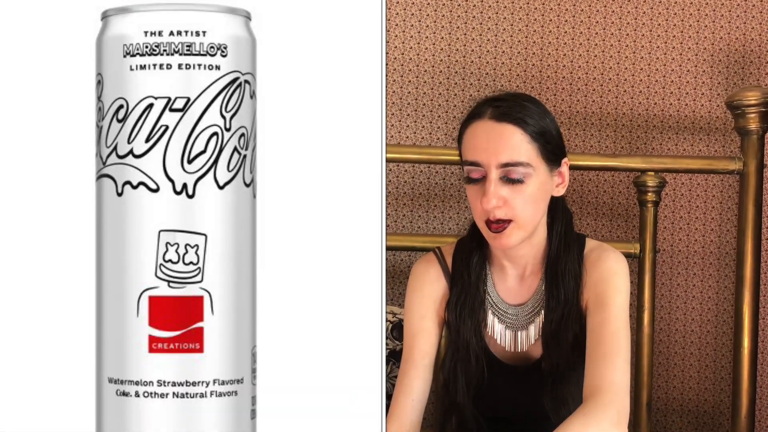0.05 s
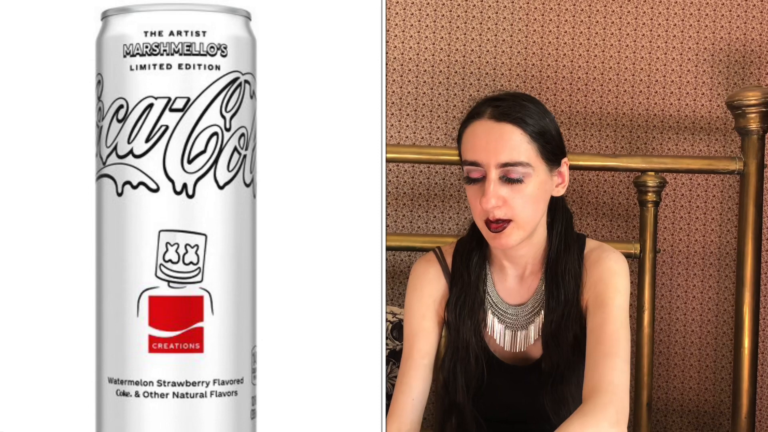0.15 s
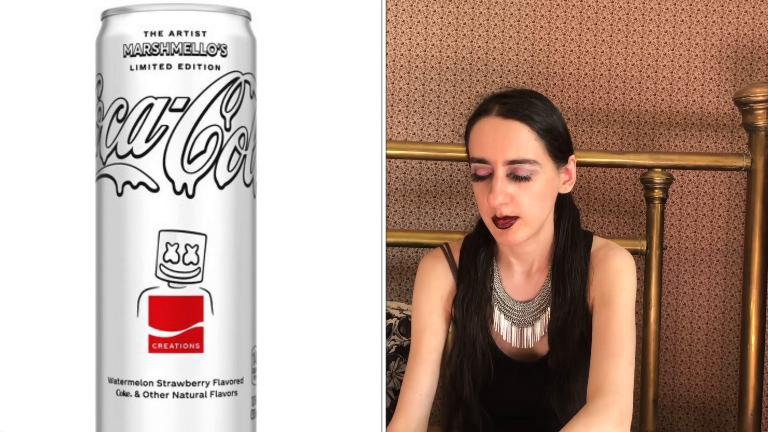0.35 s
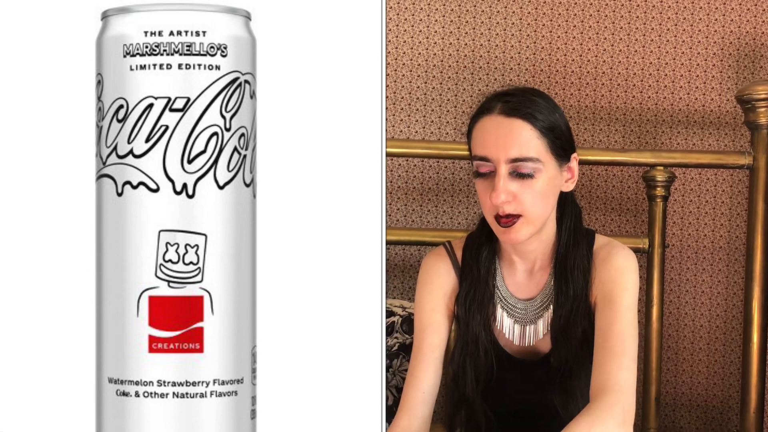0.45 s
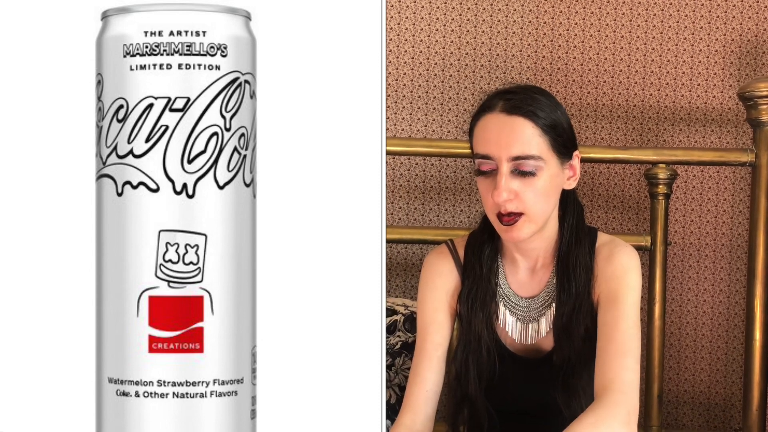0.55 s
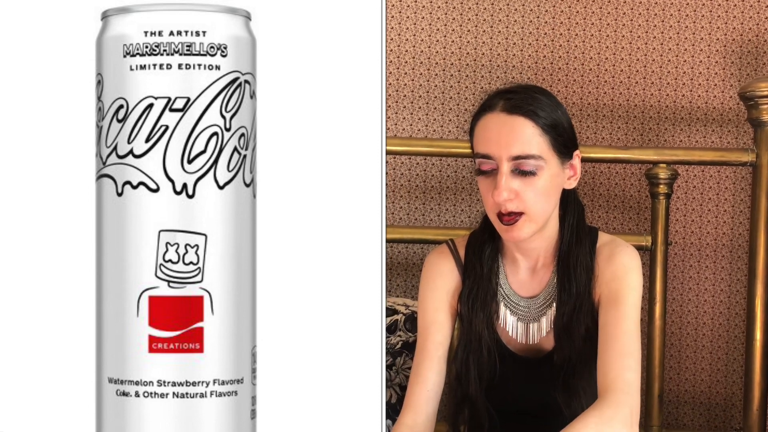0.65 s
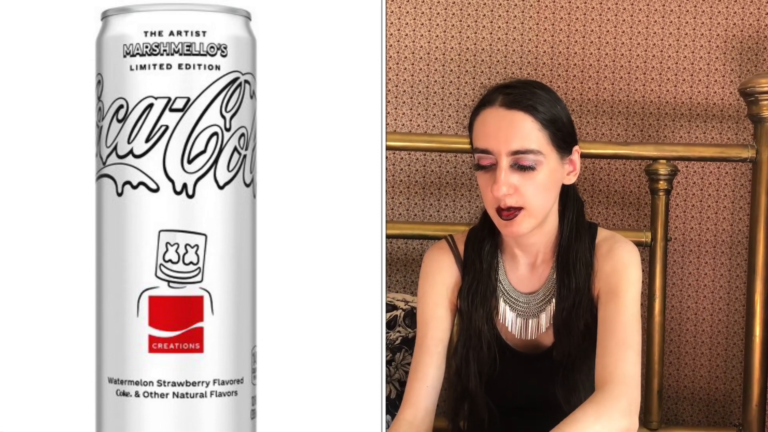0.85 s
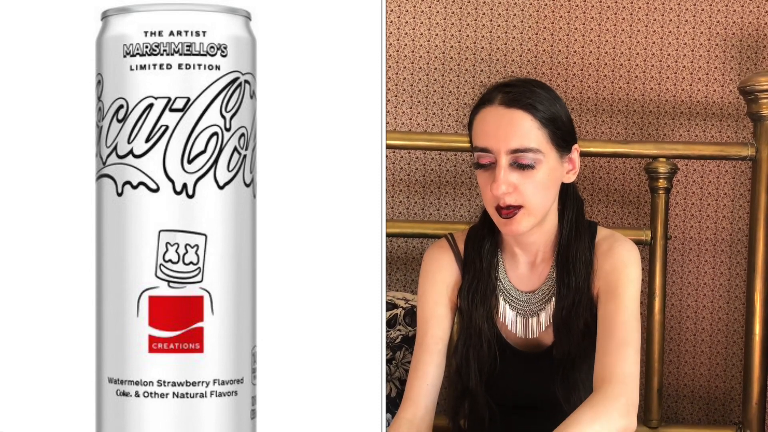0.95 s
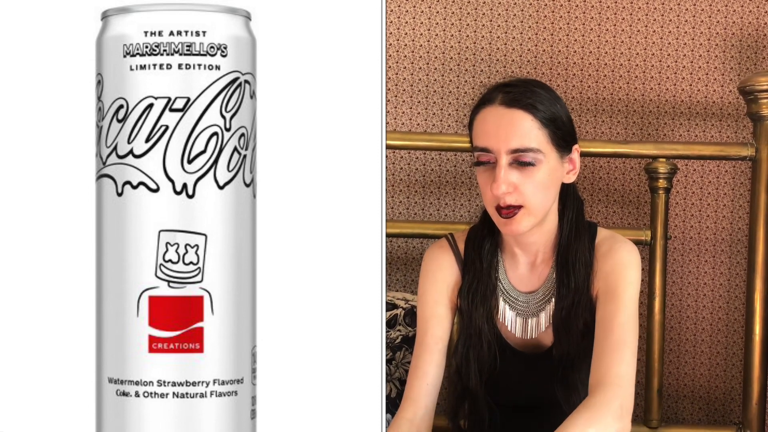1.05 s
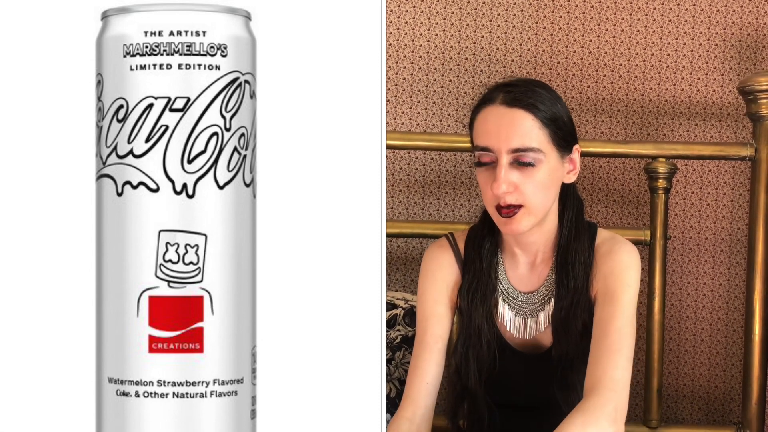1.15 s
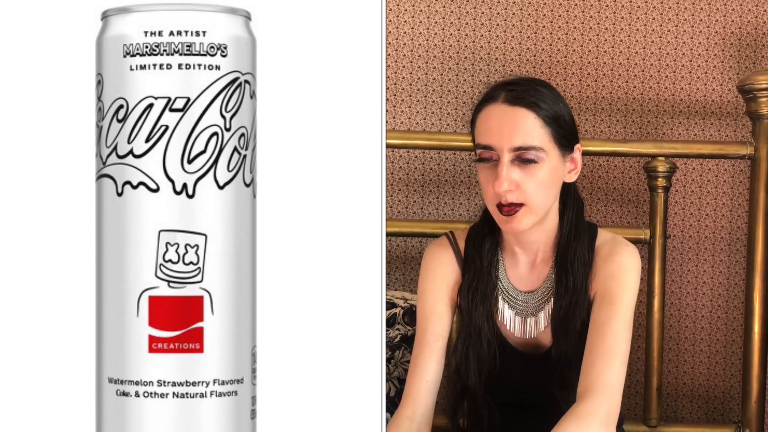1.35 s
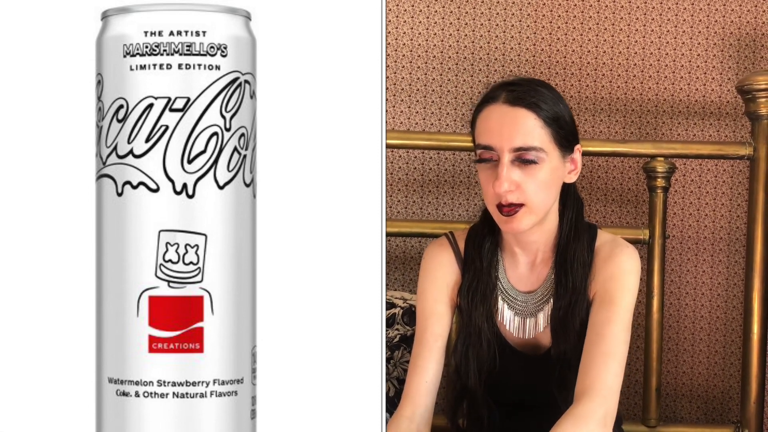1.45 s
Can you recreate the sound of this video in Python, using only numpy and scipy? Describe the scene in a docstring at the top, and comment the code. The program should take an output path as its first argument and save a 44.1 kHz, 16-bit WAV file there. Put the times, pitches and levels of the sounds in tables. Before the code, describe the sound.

An aluminium can is opened: pop, short gas hiss, loud metallic cracks, then tab clicks.

```python
"""Aluminium drink cans are opened close to a microphone in a small room. A seal pops, gas hisses
through the slit, the lid cracks along its score and the tab clicks. Each blow is a noise burst that
knocks the can and rings the tab or lid and the thin wall; the air inside gives one hollow note.
The room answers, mains hum and room tone lie underneath, the loudest cracks overload the microphone."""
import sys
import numpy as np
from scipy import signal
from scipy.fft import rfft, irfft, next_fast_len
from scipy.io import wavfile

SR = 44100
rng = np.random.default_rng(int(sys.argv[2]) if len(sys.argv) > 2 else 0)


def dump_mix(stems):
    """Bounce the given channels to the path in sys.argv[1] as a 16-bit WAV at rate SR."""
    frames = np.atleast_2d(stems).T  # one column per channel
    limited = np.clip(frames, -1, 1)  # hard clip at full scale
    pcm = np.round(limited * 32767).astype(np.int16)
    wavfile.write(sys.argv[1], SR, pcm)


N = 66150
T = np.arange(N) / SR

# mains harmonics (frequency [Hz], level [dB])
HUM_PARTIALS = [(58.3, -39), (116.6, -52.5), (174.9, -57), (233.2, -58)]
# hum level (time [s], gain [dB])
HUM_LEVEL = [(0, 1.5), (.55, 1.5), (.7, -2), (1.2, -1.5), (1.45, -1.5)]
# room tone spectrum (frequency [Hz], gain [dB])
ROOM_TONE_SPECTRUM = [(25, -9), (90, -4), (200, -8), (290, -5.5), (400, -7.5), (600, -14), (830, -13.5),
                      (1300, -17), (1700, -24), (3000, -30.5), (8000, -36), (15500, -46)]
# blows (time [s], level [dB], burst t60 [s], ring [dB], bass [dB], mid [dB], treble [dB],
# knock [dB], room [dB])
SEAL_POPS = [(.2060, -0.5, 0.014, -5, -4.5, -5, 3, -28.5, -5.5),
             (.2128, -7, .012, -5.5, 6.5, 7, -10, -31, -4.5)]
LID_CRACKS = [(.3257, -1, 0.0092, -1.5, 6.5, 7.5, 2, -39, -9),
              (.3388, -7.5, 0.0091, 1, -8, -5, 7, -30, -8.5),
              (.6207, 9.5, .013, -3, -5.5, 5, 1.5, -22.5, -8.5),
              (.8778, 5.5, 0.017, -3, 2.5, -13.5, -12, -21, -8)]
TAB_CLICKS = [(.5685, -45, .006, -12, 0, -7, 5, -24, -1), (.5985, -35.5, .007, -5, 8, 11, -4.5, -17, 6),
              (.8548, -32.5, 0.0017, -20, 5, 3, -18, -28, 3),
              (1.0841, -6.5, 0.0072, -38, 1, 1, -4.5, -24, -10),
              (1.1060, -23.5, 0.011, -20, 12, 14, 0, -18, -7),
              (1.2742, -42, 0.0052, -16, 6.5, 2, 0, -4.5, -20),
              (1.2842, -30, 0.0077, -10, 18, 7.5, -7, -18, -4),
              (1.2908, -17, 0.0087, 3, -2.5, 9.5, -18.5, -19.5, -10.5)]
# burst spectra (frequency [Hz], gain [dB])
POP_SPECTRUM = [(100, -33.5), (1800, -16), (2800, -11.5), (4800, -13), (5700, 4), (6700, -3.5),
                (8500, -8.5), (11000, -20), (15500, -22.5)]
CRACK_SPECTRUM = [(100, -23.5), (600, -23.5), (1050, -16), (1900, -9.5), (2700, -6), (3200, -5),
                  (3850, 2.5), (4400, -1), (5800, -5), (8000, -11), (11000, -16.5), (15500, -22.5)]
CLICK_SPECTRUM = [(200, -30), (900, -33.5), (1600, -18), (2700, -5.5), (3200, -10), (3700, -8.5),
                  (4400, -9), (5700, 3), (7000, -6.5), (9500, -14.5), (13000, -11.5), (15500, -19.5)]
# modes of the tab and the hand-damped lid (frequency [Hz], level [dB], t60 [s])
TAB_MODES = [(5106, -3, 0.0084), (5720, 0.5, 0.0032), (6730, -12, .007), (7180, -6.5, 0.017),
             (14300, -16, .004)]
LID_MODES = [(905, -19.5, 0.009), (1133, -16, .012), (2721, -2.5, 0.013), (3670, -1, 0.0098),
             (3927, -3, .015), (4410, -7, 0.012), (4710, -13, 0.013), (5730, -11, .01)]
# decay of near-wall reflections and late tail (frequency [Hz], t60 [s])
EARLY_DECAY = [(200, 0.033), (1500, 0.18), (4000, 0.097), (15000, 0.23)]
LATE_DECAY = [(200, 0.12), (1500, 0.31), (4000, 0.34), (9000, 0.29), (15000, 0.1)]
# gas hiss envelope (time [s], level [dB])
GAS_ENVELOPE = [(0.208, -16.5), (0.214, -15), (0.219, -4), (.25, -5), (0.282, -6.5), (0.291, -8),
                (0.321, -14), (.342, -17.5), (0.354, -23), (.375, -65)]
# jet spectrum (frequency [Hz], gain [dB])
JET_SPECTRUM = [(100, -35.5), (700, -20.5), (1700, -21), (3000, -9), (5000, -6), (6500, -0.5), (9500, 0.5),
                (11000, -1.5), (13000, 3.5), (15600, -3.5)]
# slit whistles (frequency [Hz], width [Hz], gain [dB])
SLIT_RESONANCES = [(5697, 45, 1), (6397, 40, 1), (8461, 40, 4), (8988, 50, 1), (9305, 35, 3), (9390, 50, 4),
                   (9700, 70, 2), (11624, 30, 3)]

ROOM_TONE_DB = -45
BASS_HZ, MID_HZ, MID_OCTAVES, TREBLE_HZ = 1190, 1620, .38, 7800
KNOCK_HZ = 432
WALL_HZ, WALL_SPREAD_HZ, WALL_COUNT, WALL_T60_S = 3796, 150, 40, .33
ECHO_COUNT, ECHO_DB, ECHO_SPAN_S = 7, -10, .018
PREDELAY_S, LATE_DB, GAS_ROOM_DB = .004, -5.5, -9
CAVITY_START_S, CAVITY_HZ, CAVITY_DB, CAVITY_T60_S = .326, 542, -25.5, .15
BAND_LIMIT_HZ = 15900


def amp(db):
    """Decibels to gain."""
    return 10 ** (np.asarray(db) / 20)


def unit_rms(x):
    """Scale to rms 1."""
    return x / np.sqrt(np.mean(x ** 2) + 1e-20)


def curve_at(points, hz):
    """Interpolate (frequency [Hz], value) points on a log axis."""
    point_hz, values = np.transpose(points)
    return np.interp(np.log(hz + 1), np.log(point_hz + 1), values)


def filtered(x, response):
    """Apply a frequency response."""
    size = next_fast_len(N + SR // 4)
    return irfft(rfft(x, size) * response(np.fft.rfftfreq(size, 1 / SR)), size)[:N]


def minimum_phase(gain, size):
    """Causal impulse response of a gain curve."""
    cepstrum = irfft(np.log(np.maximum(gain, 1e-6)))
    cepstrum[1:size // 2] *= 2
    cepstrum[size // 2 + 1:] = 0
    return irfft(np.exp(rfft(cepstrum)))


def add(track, start_s, x):
    """Mix x into the track."""
    i = max(round(start_s * SR), 0)
    track[i:i + len(x)] += x[:len(track[i:])]


def mains_hum():
    """Mains harmonics, about 3 dB quieter after 0.6 s."""
    hum = sum(np.sqrt(2) * amp(db) * np.sin(2 * np.pi * (hz * T + rng.random()))
              for hz, db in HUM_PARTIALS)
    return hum * amp(np.interp(T, *np.transpose(HUM_LEVEL)))


def room_tone():
    """Steady dull noise."""
    noise = filtered(rng.standard_normal(N), lambda hz: amp(curve_at(ROOM_TONE_SPECTRUM, hz)))
    return amp(ROOM_TONE_DB) * unit_rms(noise)


def metal_blows(blows, spectrum, modes, wall_db, size=1024):
    """Bursts of tearing or slipping metal knock the can and ring the struck part and the wall."""
    out = np.zeros(N)
    t, hz = np.arange(SR // 2) / SR, np.fft.rfftfreq(size, 1 / SR)
    colour = unit_rms(amp(curve_at(spectrum, hz)))
    bass = 1 / (1 + (hz / BASS_HZ) ** 4)
    mid = np.exp(-(np.log2((hz + 1) / MID_HZ) / MID_OCTAVES) ** 2)
    treble = 1 - 1 / (1 + (hz / TREBLE_HZ) ** 4)
    knock = np.sin(2 * np.pi * KNOCK_HZ * t) * np.exp(-2 * KNOCK_HZ * t)
    for start_s, db, t60_s, ring_db, bass_db, mid_db, treble_db, knock_db, room_db in blows:
        burst = rng.choice([-1, 1], len(t)) * amp(-60 * t / t60_s)
        tone = amp(bass_db * bass + mid_db * mid + treble_db * treble)
        impulse = np.pad(minimum_phase(colour * tone, size), (0, len(t) - size))
        snap = signal.fftconvolve(burst, impulse)[:len(t)]
        ring = amp(ring_db) * modal_ring(modes, t)
        direct = snap + ring + amp(knock_db) * knock + amp(wall_db) * can_wall(t)
        reverb = np.linalg.norm(burst) * room(impulse) + room(ring)
        add(out, start_s, amp(db) * direct)
        add(out, start_s, amp(db + room_db) * reverb)
    return out


def modal_ring(modes, t):
    """Damped modes of alternating sign; strengths scatter per blow."""
    scatter_db = rng.standard_normal(len(modes))
    return sum((-1) ** k * amp(db + scatter_db[k] - 60 * t / t60_s) * np.sin(2 * np.pi * hz * t)
               for k, (hz, db, t60_s) in enumerate(modes))


def can_wall(t):
    """Close modes of the thin wall beat into a rough metallic ring."""
    hz = WALL_HZ + WALL_SPREAD_HZ * rng.standard_normal((WALL_COUNT, 1))
    phase = rng.random((WALL_COUNT, 1))
    crowd = np.sin(2 * np.pi * (hz * t + phase)).sum(0)
    return crowd / np.sqrt(WALL_COUNT) * amp(-60 * t / WALL_T60_S)


def gas_jet():
    """Gas hisses through the slit from the first pop, fading as the pressure falls."""
    def response(hz):
        slit = 1 + sum(amp(db) * 1j * hz * width_hz / (peak_hz ** 2 - hz ** 2 + 1j * hz * width_hz)
                       for peak_hz, width_hz, db in SLIT_RESONANCES)
        return amp(curve_at(JET_SPECTRUM, hz)) * slit

    jet = unit_rms(filtered(rng.standard_normal(N), response))
    level_db = np.interp(T, *np.transpose(GAS_ENVELOPE), right=-120)
    seal_open = T > SEAL_POPS[0][0]
    hiss = jet * amp(level_db) * seal_open
    return hiss + amp(GAS_ROOM_DB) * room(hiss)


def diffuse_tail(decay):
    """Noise of energy 1, each band decaying at its own rate."""
    hz, t, bands = signal.stft(rng.standard_normal(SR // 2), SR, nperseg=256)
    fade = amp(-60 * t / curve_at(decay, hz)[:, None])
    tail = signal.istft(bands * fade, SR, nperseg=256)[1]
    return tail / np.linalg.norm(tail)


def room(x):
    """Near-wall reflections, a late tail and a few echoes off hard surfaces."""
    diffuse = diffuse_tail(EARLY_DECAY) + amp(LATE_DB) * diffuse_tail(LATE_DECAY)
    delays = (rng.random(ECHO_COUNT) * ECHO_SPAN_S * SR).astype(int)
    gains = rng.choice([-1, 1], ECHO_COUNT) * amp(ECHO_DB) / np.sqrt(ECHO_COUNT)
    echoes = np.bincount(delays, gains, len(diffuse))
    response = np.pad(diffuse + echoes, (round(PREDELAY_S * SR), 0))
    return signal.fftconvolve(x, response)[:N]


def can_cavity():
    """The air inside the can rings one short hollow note."""
    out = np.zeros(N)
    add(out, CAVITY_START_S, modal_ring([(CAVITY_HZ, CAVITY_DB, CAVITY_T60_S)], T))
    return out


def scene():
    """Cans, gas and background at the microphone, mono."""
    pops = metal_blows(SEAL_POPS, POP_SPECTRUM, TAB_MODES, wall_db=-30.5)
    cracks = metal_blows(LID_CRACKS, CRACK_SPECTRUM, LID_MODES, wall_db=-26)
    clicks = metal_blows(TAB_CLICKS, CLICK_SPECTRUM, TAB_MODES, wall_db=-30.5)
    return (pops + cracks + clicks + can_cavity() + gas_jet() + mains_hum() + room_tone())[None]


def record(dry):
    """Microphone overload: soft clip at full scale, then a steep low-pass."""
    clipped = dry[0] / (1 + np.abs(dry[0]) ** 8) ** (1 / 8)
    return filtered(clipped, lambda hz: 1 / (1 + (hz / BAND_LIMIT_HZ) ** 240))[None]


dry = scene()
out = record(dry)
dump_mix(out)
```